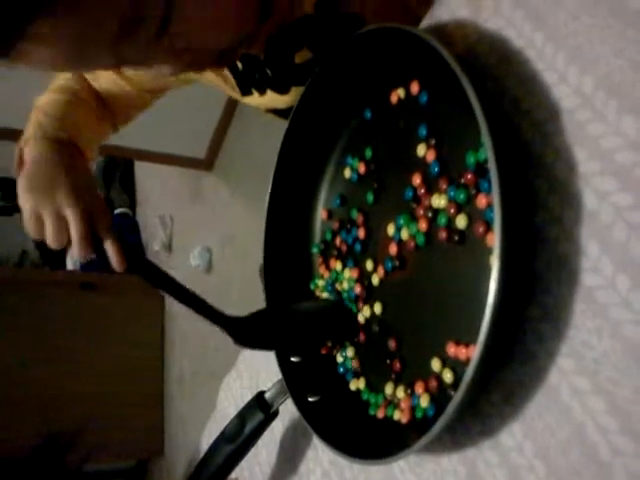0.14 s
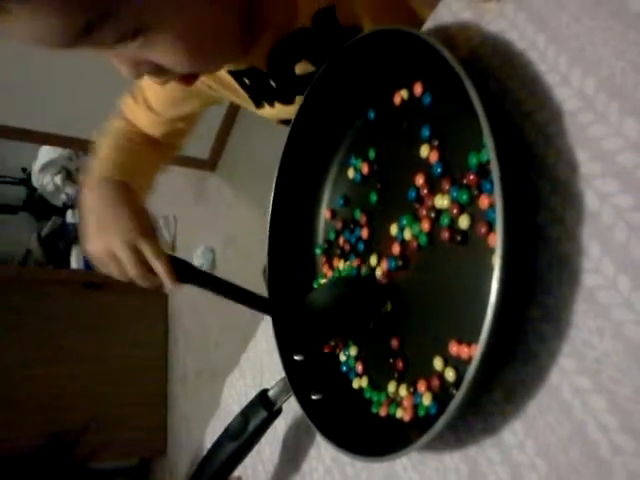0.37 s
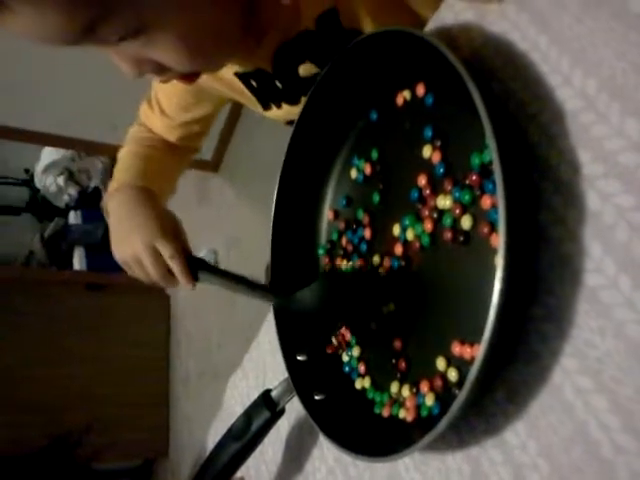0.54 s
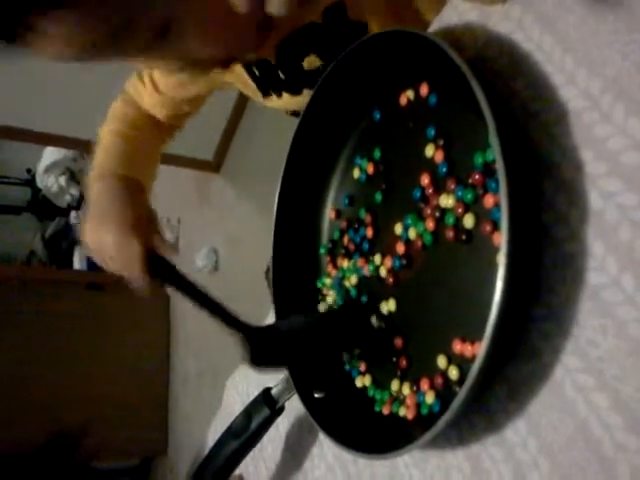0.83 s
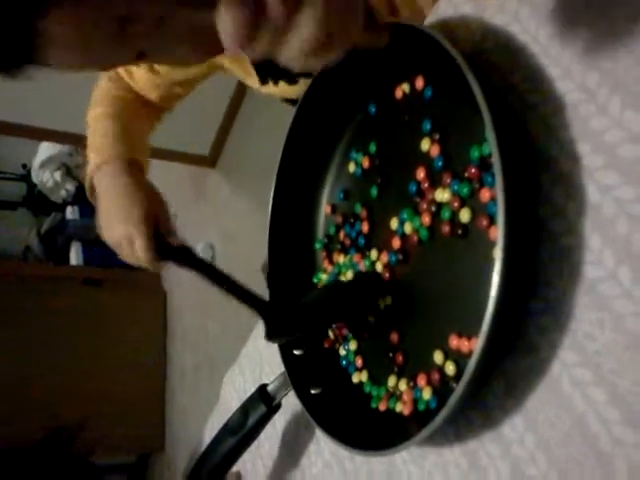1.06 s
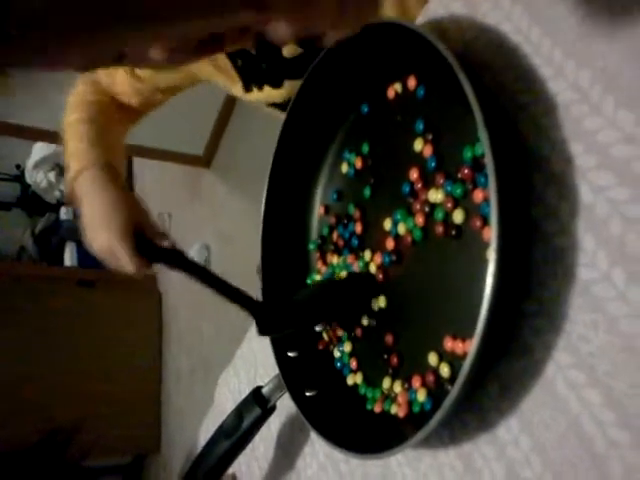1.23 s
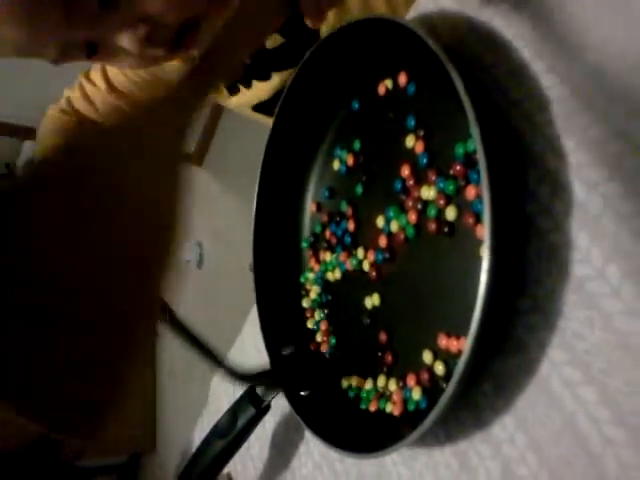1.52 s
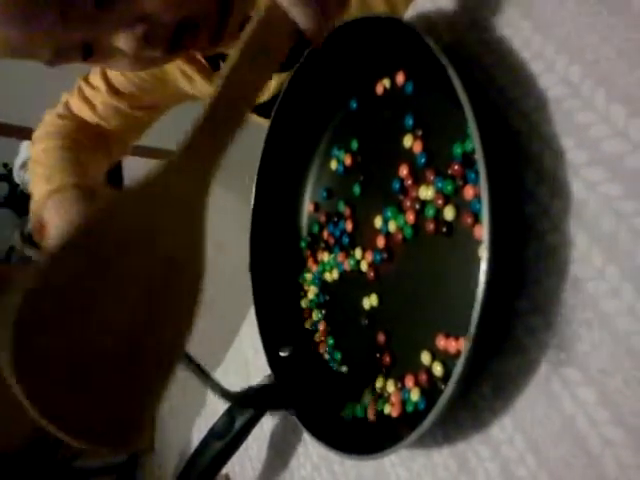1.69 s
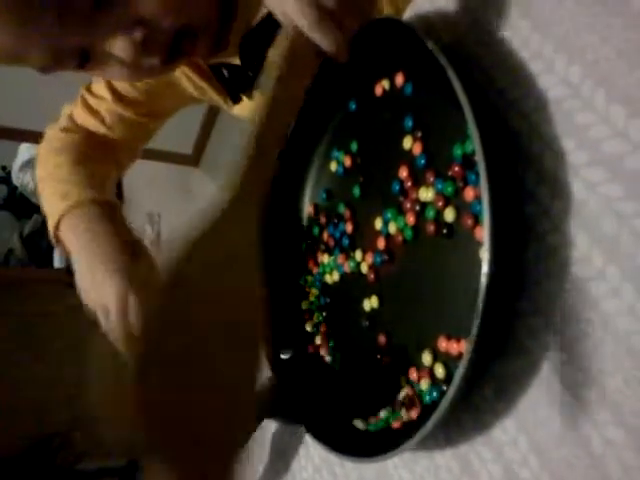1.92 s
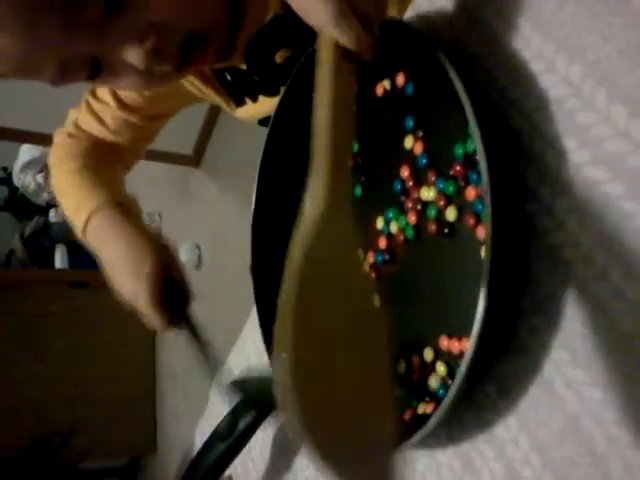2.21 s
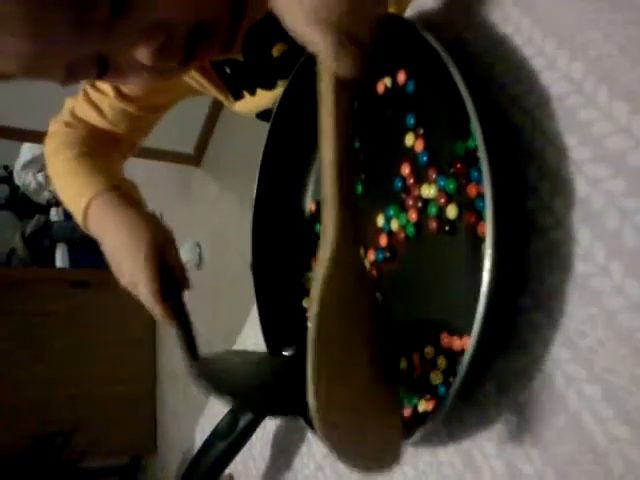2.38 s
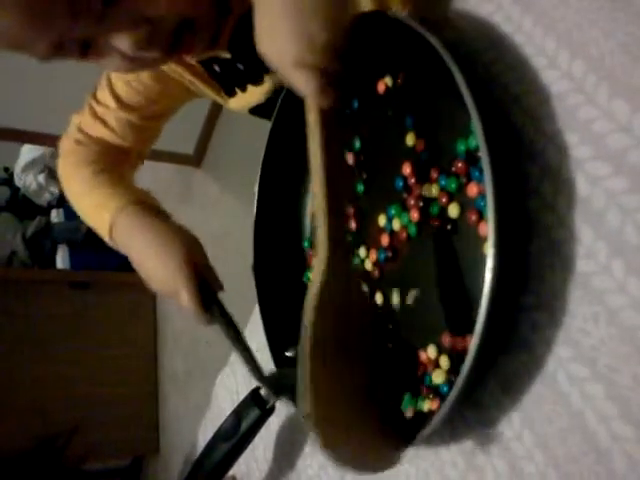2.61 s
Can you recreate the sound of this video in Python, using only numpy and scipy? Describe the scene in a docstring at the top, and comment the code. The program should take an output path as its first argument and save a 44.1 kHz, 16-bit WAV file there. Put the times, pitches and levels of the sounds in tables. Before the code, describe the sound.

Hard candies rattle and roll in a frying pan, stirred in uneven bursts with light spatula scrapes and bumps. Near the end a wooden spoon clacks hard, then softly. The microphone is close and dull-sounding, in a small room.

```python
"""Small hard candies are pushed around a frying pan in a small room. At first the pan rings low from a blow,
a plastic spatula scrapes and bumps it, and the candies click, rattle and roll to rest. At about 1.25 s
the spatula knocks the pan again and the candies rattle in louder surges that die down. Near 2.5 s they
surge once more and a wooden spoon clacks down hard, overloading a microphone that hears little above
4 kHz. A softer clack follows at the end."""
import sys
import numpy as np
from scipy import signal
from scipy.fft import rfft, irfft, next_fast_len
from scipy.io import wavfile

SR = 44100
rng = np.random.default_rng(int(sys.argv[2]) if len(sys.argv) > 2 else 0)


def wav_out(sig):
    """Save sig, one row per channel (or a flat mono array), as 16-bit PCM at SR to the path in sys.argv[1]."""
    wavfile.write(sys.argv[1], SR, np.round(np.clip(np.atleast_2d(sig).T, -1, 1) * 32767).astype(np.int16))


N = 121275


# the tone of a candy shell's snap: f/Hz, level/dB
SNAP_TONE = [(40, -8), (200, -8.5), (600, -8), (1400, -5.5), (2200, 4.5), (3300, 1), (5000, -9)]
def candy_hits(hits, width_s, snap_db):
    """A hard candy makes a very short ping and a sharp snap each time it hits something."""
    t = np.arange(SR // 100) / SR
    swell = np.exp(-(t / width_s - 2) ** 2)
    pings, snaps = np.zeros(N), np.zeros(N)
    for (s, db, hz), (phase, coin) in zip(hits, rng.random((len(hits), 2))):
        add(pings, s, amp(db) * swell * np.sin(2 * np.pi * (hz * t + phase)))
        spike = np.sign(coin - .5) * amp(db + snap_db) * SR / hz / 2
        add(snaps, s + 2 * width_s, np.array([spike]))
    return pings + coloured(snaps, SNAP_TONE)


# single candies hitting the pan: t/s, level/dB, f/Hz
CANDY_CLICKS = [(0.0024, -29.5, 2640), (0.1249, -33.5, 2620), (0.1828, -27.5, 2680), (0.2078, -30, 2600),
                (0.2327, -30.5, 2600), (0.2553, -31, 2690), (0.3433, -31, 2600), (0.4746, -35, 2690),
                (0.4989, -35, 2930), (0.5068, -37, 2880), (1.254, -21.5, 3080), (1.261, -9, 2732),
                (1.379, -23, 3130), (1.3864, -19, 3080), (1.3977, -19, 2650), (1.4291, -23.5, 2770),
                (1.4696, -25.5, 2630), (1.5049, -26.5, 2830), (1.5204, -27.5, 2844), (1.5384, -27, 2914),
                (1.5744, -26.5, 2750), (1.6868, -22, 3110), (1.7001, -25.5, 2620), (1.7564, -29, 2730),
                (1.9432, -29.5, 2900), (1.9598, -25.5, 2750), (1.9734, -25, 2910), (2.003, -30.5, 2570),
                (2.1295, -35, 2980), (2.1979, -34.5, 2800), (2.4236, -4.5, 2900), (2.4274, -10, 2730),
                (2.5596, -19, 2660), (2.595, -24, 2730), (2.6232, -29.5, 2670), (2.6568, -22, 2630)]
def candy_clicks():
    """Some candies hit the pan clearly enough to be heard one by one."""
    return amp(0.5) * candy_hits(CANDY_CLICKS, width_s=0.000803, snap_db=-7.5)


# pushes through the heap: t/s of the peak, level/dB, rise/s and fall/s (each over 60 dB), f/Hz
CANDY_PUSHES = [(0.004, -38.5, .02, 0.18, 2410), (0.133, -46, .025, 0.33, 2935),
                (0.2, -39.5, .3, 0.74, 2597), (0.31, -38.5, .2, 0.13, 2713), (0.503, -48, .08, .25, 2860),
                (0.85, -71.5, 1.5, 5.5, 3070), (1.266, -30, 0.036, 0.08, 2740),
                (1.392, -27, .13, 0.274, 3000), (1.525, -40, 0.52, .5, 2787), (1.695, -36, .15, 0.7, 2917),
                (1.755, -44.5, 0.48, 0.1, 2900), (1.88, -49, .2, 1.14, 2950),
                (1.977, -41.5, .12, 0.14, 2914), (2.14, -52, 0.94, .5, 3004),
                (2.426, -15, 0.011, .02, 2920), (2.436, -29, .03, 0.04, 3200),
                (2.458, -19, .05, 0.13, 2987), (2.565, -35, 0.21, 0.4, 2930), (2.685, -38, 0.19, 0.2, 2740)]
def candy_rattle(hits_per_s=600, count=4000):
    """Each push swells and fades a stream of tiny hits; the strongest push sets their pitch."""
    level_luck, pitch_luck = rng.standard_normal((count, 2)).T
    times = np.cumsum(rng.gamma(2, .5, count)) / hits_per_s
    t = np.arange(N) / SR
    force = np.array([amp(db - 60 * np.maximum((s - t) / rise, (t - s) / fall))
                      for s, db, rise, fall, hz in CANDY_PUSHES])
    push_hz = np.array(CANDY_PUSHES)[:, -1][force.argmax(axis=0)]
    hit_hz = np.interp(times, t, push_hz) * np.exp(.11 * pitch_luck)
    hit_db = 3.5 * np.minimum(level_luck, 2)
    hits = np.column_stack([times, hit_db, hit_hz])[times < N / SR]
    stream = unit(candy_hits(hits, width_s=.0007, snap_db=-4))
    return stream * amp(-0.5) * np.linalg.norm(force, axis=0)


# loose candies rolling to rest: t/s, length/s, level/dB
CANDY_ROLLS = [(0.331, 0.18, -60.5), (0.496, 0.31, -59.5), (0.701, 0.56, -70)]
# the tone of the rolling: f/Hz, level/dB
ROLL_TONE = [(100, -24.5), (280, -4), (500, -19.5), (1750, -13.5), (2100, 1.5), (2400, -8), (2750, -5),
             (3200, -19), (4000, -21)]
def candy_rolling():
    """Candies whirr softly and unevenly as they cross the pan floor."""
    return sum(amp(db) * rub(s, length, ROLL_TONE, jolts_per_s=180, rough_db=2.5)
               for s, length, db in CANDY_ROLLS)


# the spoon landing on the pan: t/s, level/dB, brightness/(dB per octave)
SPOON_CLACKS = [(2.4662, -7.5, 6), (2.4696, 2, -3), (2.4790, -11, 2.5), (2.4910, -7.5, -2.5),
                (2.5150, -13.5, -14), (2.5350, -23, 0.5), (2.6820, -16.5, 0.5), (2.6900, -24, -5)]
# the notes the spoon rings with: f/Hz, level/dB, time to fade by 60 dB/s
SPOON_NOTES = [(1179, -29, 0.11), (1239, -26, 0.2), (1485, -26.5, .06), (1763, -18, 0.065),
               (1826, -12, .06), (1869, -10.5, 0.11), (2108, -21, .06), (2280, -19.5, 0.039),
               (2370, -22.5, .05), (2456, -18, 0.054), (2573, -10, 0.055), (2673.5, -1, 0.027),
               (3020, -19, 0.014), (3500, -25.5, 0.019)]
def spoon_clacks():
    """The wooden spoon clacks and chatters on the pan, ringing briefly each time."""
    return struck(SPOON_CLACKS, SPOON_NOTES, rise_s=0.0011, scatter_db=2.5)


# the spatula rubbing the pan floor: t/s, length/s, level/dB, centre f/Hz
SPATULA_SCRAPES = [(0.149, 0.068, -56.5, 630), (0.297, 0.029, -45, 596), (1.688, 0.13, -51.5, 555),
                   (1.851, .035, -54, 450), (1.998, .15, -62.5, 542), (2.578, 0.032, -39.5, 535)]
# the tone of a scrape: multiple of the centre frequency, level/dB
SCRAPE_TONE = [(.2, -20), (.6, -8), (.85, -2.5), (1.1, 5.5), (1.4, -11.5), (2.5, -18), (5, -36.5)]
def spatula_scrapes():
    """The plastic spatula slips unevenly, making a low, rough noise."""
    out = np.zeros(N)
    for s, length, db, hz in SPATULA_SCRAPES:
        tone = [(hz * multiple, level) for multiple, level in SCRAPE_TONE]
        out += amp(db) * rub(s, length, tone, jolts_per_s=160, rough_db=4.5)
    return out


# spatula and spoon bumping the pan: t/s, level/dB, time to fade by 60 dB/s
UTENSIL_BUMPS = [(0.0, -40.5, 0.2), (0.297, -35.5, 0.076), (0.475, -43.5, 0.085), (0.498, -44, 0.099),
                 (1.254, -34.5, 0.033), (1.2595, -26, 0.21), (1.273, -33, .08), (1.378, -36.5, 0.13),
                 (1.395, -40.5, .1), (1.9645, -31, 0.14), (2.423, -25, 0.19), (2.466, -18.5, 0.12),
                 (2.681, -23.5, 0.11)]
# the tone of a bump: f/Hz, level/dB
BUMP_TONE = [(30, -24.5), (80, -14.5), (250, -5), (600, 2.5), (900, 3), (1300, 3.5), (1600, -0.5),
             (2100, 3), (3000, -2), (4000, -6)]
def utensil_bumps():
    """The utensils knock dully against the pan."""
    return dull_knocks(UTENSIL_BUMPS, BUMP_TONE)


# spatula blows that set the pan ringing: t/s, level/dB, brightness/(dB per octave)
PAN_STRIKES = [(-0.085, -32, -2), (1.254, -34, 1.5)]
# the notes the pan rings with: f/Hz, level/dB, time to fade by 60 dB/s
PAN_NOTES = [(268.7, -5, 0.83), (683, -6.5, 0.47), (1162, 3.5, 0.22), (1500, -18, .2), (1870, -6.5, .16),
             (2078, -8, 0.11), (2480, -11.5, .2)]
def pan_ring(twin_hz=20, twin_db=-3):
    """The whole pan rings; its lowest note has a twin just above it, so the hum throbs."""
    hz, db, fade_s = PAN_NOTES[0]
    twin = (hz + twin_hz, db + twin_db, fade_s)
    return struck(PAN_STRIKES, PAN_NOTES + [twin], rise_s=.007, scatter_db=.5)


# the pan knocking the table: t/s, level/dB, time to fade by 60 dB/s
TABLE_THUDS = [(0.01, -47, 0.55), (0.13, -62.5, .3), (1.289, -45.5, 0.14), (1.395, -49.5, 0.27),
               (2.466, -30.5, 0.14), (2.56, -56.5, 0.66), (2.682, -48.5, 0.33)]
# the tone of a thud: f/Hz, level/dB
THUD_TONE = [(25, -16), (60, -9.5), (130, -6), (200, -1), (320, 2), (500, -15.5), (1000, -41)]
def table_thuds():
    """The pan thuds deeply on the padded table."""
    return dull_knocks(TABLE_THUDS, THUD_TONE)


# how long the room echoes: f/Hz, time to fade by 60 dB/s
ROOM_FADE = [(200, 0.87), (1500, 0.57), (3500, 0.22)]
def room_echo(x, pieces=28, near_fade_s=0.058, near_db=-6, far_db=-12.5):
    """Sound bounces off the nearby pan wall and table top, and off the far walls of the room."""
    out, size = np.zeros(N), SR // 2
    t = np.arange(size) / SR
    # each piece of the sound gets its own echo, as the hits move about the pan
    for piece in np.array_split(np.arange(N), pieces):
        hz, age, bands = signal.stft(rng.standard_normal(size), SR, nperseg=256)
        fade = amp(-60 * age / along(ROOM_FADE, hz)[:, None])
        far = signal.istft(bands * fade, SR, nperseg=256)[1][:size] * (1 - np.exp(-t / 0.017))
        near = rng.standard_normal(size) * amp(-60 * t / near_fade_s) * (t > .002)
        tail = amp(far_db) * far / np.linalg.norm(far) + amp(near_db) * near / np.linalg.norm(near)
        add(out, piece[0] / SR, signal.fftconvolve(x[piece], tail))
    return out


# the tone of the room's background: f/Hz, level/dB
BACKGROUND_TONE = [(15, -67.5), (25, -34), (86, -17), (152, -14.5), (320, -1), (499, -4.5), (1440, -10.5),
                   (1860, -12.5), (2910, -14), (3380, -15), (4000, -31.5), (5200, -71.5), (8800, -120)]
def background():
    """A faint, steady noise fills the room."""
    return amp(-60) * noise(BACKGROUND_TONE)


def struck(blows, notes, rise_s, scatter_db):
    """Each blow rings an object's notes a little differently; harder contact favours the high ones."""
    out, t = np.zeros(N), np.arange(SR) / SR
    for s, db, brightness in blows:
        for hz, note_db, fade_s in notes:
            level = db + note_db + brightness * np.log2(hz / 1000) + scatter_db * rng.standard_normal()
            rise = 1 - np.exp(-t / rise_s * hz / 1000)  # rise_s holds at 1 kHz; low notes are slower
            add(out, s, amp(level - 60 * t / fade_s) * rise * np.sin(2 * np.pi * hz * t))
    return out


def dull_knocks(knocks, tone, rise_s=0.00052):
    """A dull knock shakes many short-lived notes at once, so it sounds like a burst of noise."""
    out, t = np.zeros(N), np.arange(N) / SR
    for s, db, fade_s in knocks:
        add(out, s, amp(db - 60 * t / fade_s) * (1 - np.exp(-t / rise_s)) * noise(tone))
    return out


def rub(s, length, tone, jolts_per_s, rough_db):
    """A rough rubbing noise that swells and fades."""
    t = np.arange(N) / SR
    grip = amp(rough_db * np.interp(t * jolts_per_s, np.arange(N), rng.standard_normal(N)))
    swell = np.sin(np.pi * np.clip((t - s) / length, 0, 1))
    return unit(noise(tone) * grip) * swell


def amp(db):
    """Turn decibels into a number to multiply by."""
    return 10 ** (np.asarray(db) / 20)


def unit(x):
    """Scale a sound to an average strength (rms) of 1."""
    return x / np.sqrt(np.mean(x ** 2) + 1e-20)


def along(points, hz):
    """Read between the points of a curve, with frequency spaced in octaves."""
    freqs, values = np.transpose(points)
    return np.interp(np.log(hz + 1), np.log(freqs + 1), values)


def coloured(x, tone):
    """Turn the lows and highs of a sound up or down to follow a tone curve."""
    size = next_fast_len(len(x) + 8192)
    gain = amp(along(tone, np.fft.rfftfreq(size, 1 / SR)))
    return irfft(rfft(x, size) * gain, size)[:len(x)]


def noise(tone):
    """Noise of strength 1 with the given tone."""
    return unit(coloured(rng.standard_normal(N), tone))


def add(track, s, sound):
    """Mix a sound in at time s, which may lie before the start."""
    i = int(min(round(s * SR), N - 1))
    sound, i = sound[max(-i, 0):], max(i, 0)
    track[i:i + len(sound)] += sound[:N - i]


def scene():
    """Candies, utensils and pan sound together in the room."""
    stirring = candy_clicks() + candy_rattle() + utensil_bumps() + spatula_scrapes()
    spoon = spoon_clacks()
    pan = pan_ring()
    # the spoon is nearer the microphone, so it gets less echo
    echo = room_echo(stirring + amp(-4.5) * spoon + amp(-12) * pan)
    return (stirring + spoon + pan + echo + table_thuds() + candy_rolling() + background())[None]


# how well the microphone hears lows and highs: f/Hz, level/dB
MIC_TONE = [(15, -23.5), (45, -2.5), (100, -2.5), (3200, -1.5), (3500, -1), (3800, -8.5), (4200, -14.5),
            (4500, -26.5), (4900, -75), (6000, -110)]
# the dulling of the highs after the overload: f/Hz, level/dB
DULL_HIGHS = [(4000, 0), (5000, -8.5), (7500, -4), (10000, -7.5), (14000, -0.5)]
def record(dry, ceiling=.73, hardness=20, top_hz=15800):
    """The microphone misses most highs and flattens the loudest peaks; the very top is then cut off."""
    heard = coloured(dry[0], MIC_TONE)
    flattened = heard / (1 + np.abs(heard / ceiling) ** hardness) ** (1 / hardness)
    dulled = coloured(flattened, DULL_HIGHS)
    top_cut = [(top_hz - 400, 0), (top_hz, -10), (top_hz + 200, -90)]
    return coloured(dulled, top_cut)[None]


dry = scene()
out = record(dry)
wav_out(out)
```